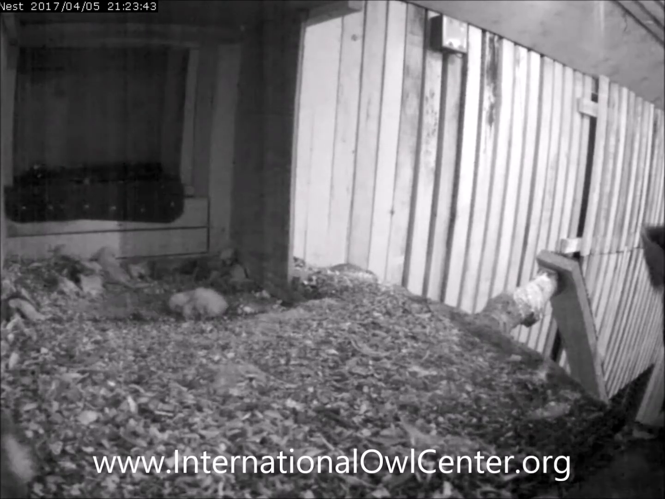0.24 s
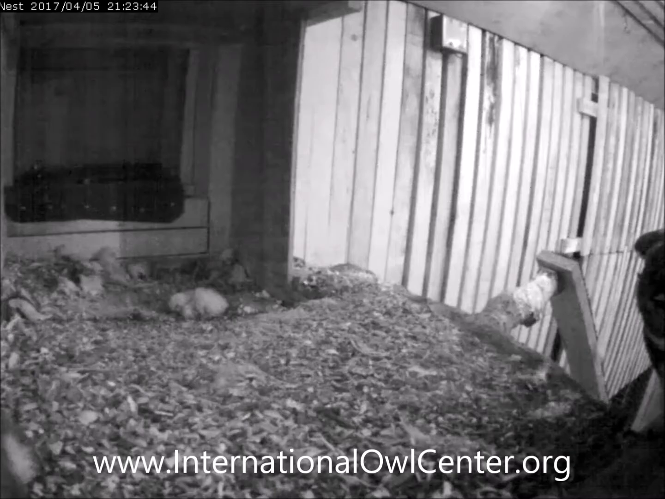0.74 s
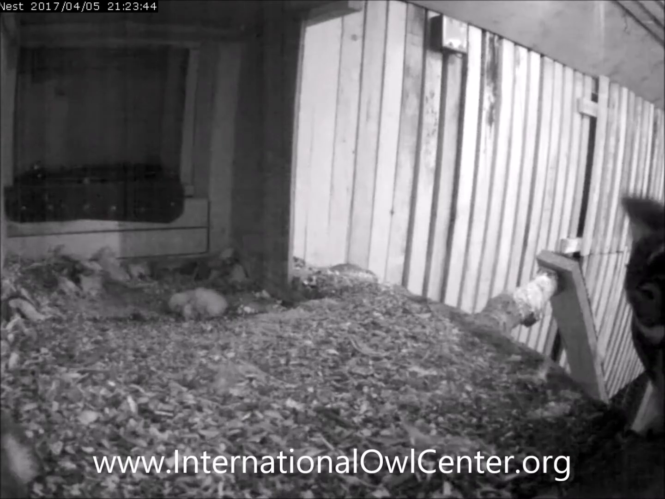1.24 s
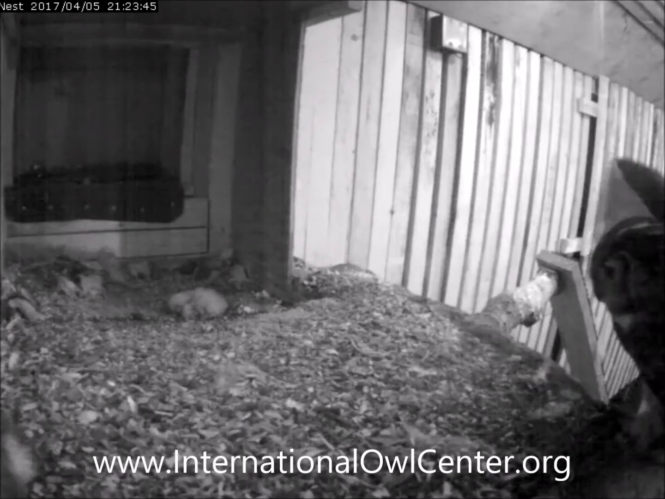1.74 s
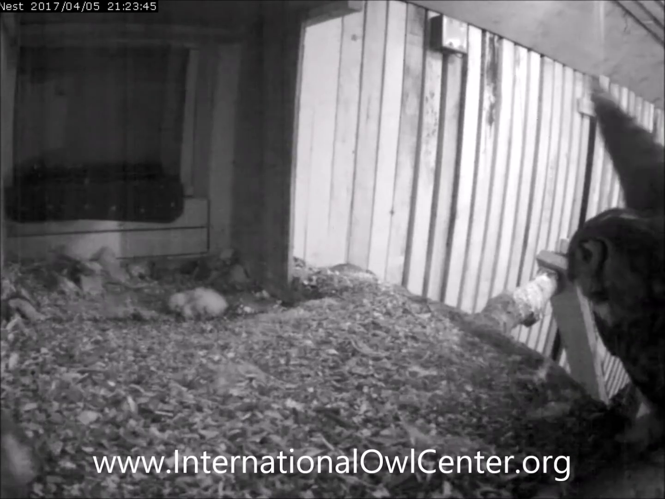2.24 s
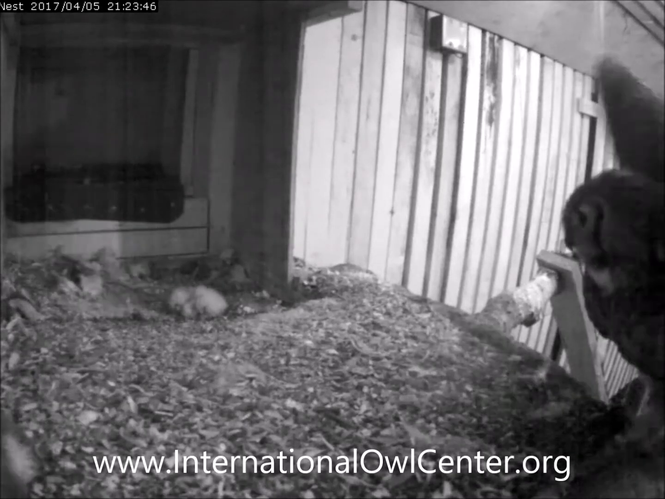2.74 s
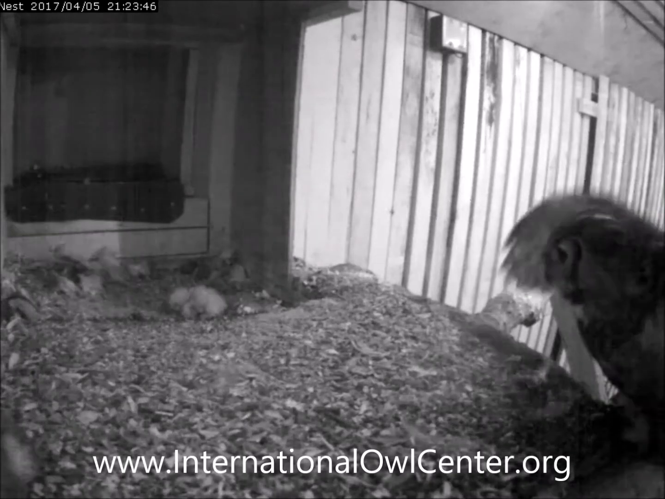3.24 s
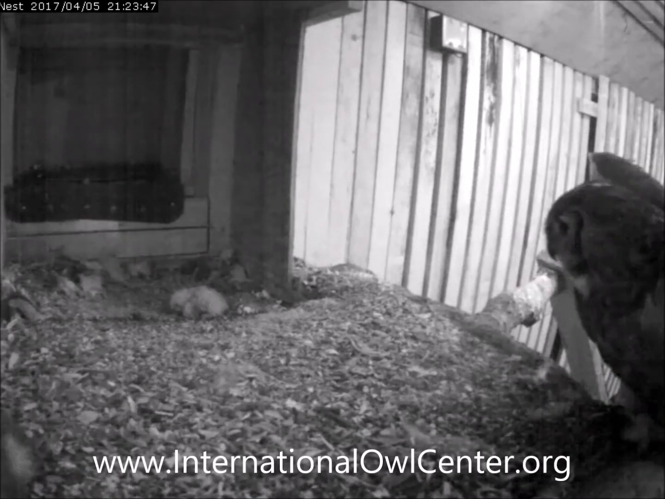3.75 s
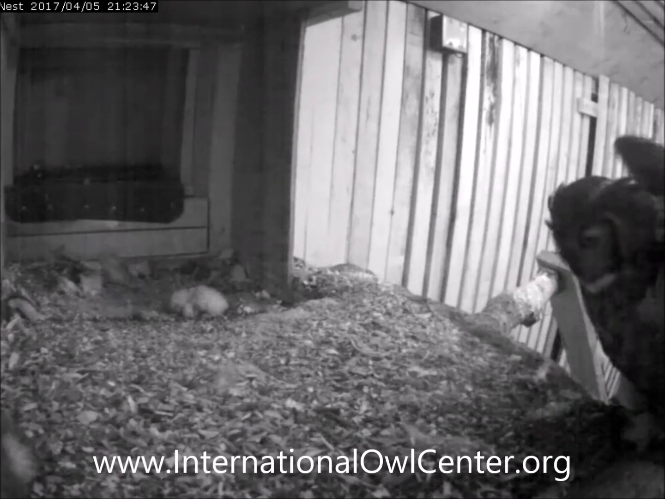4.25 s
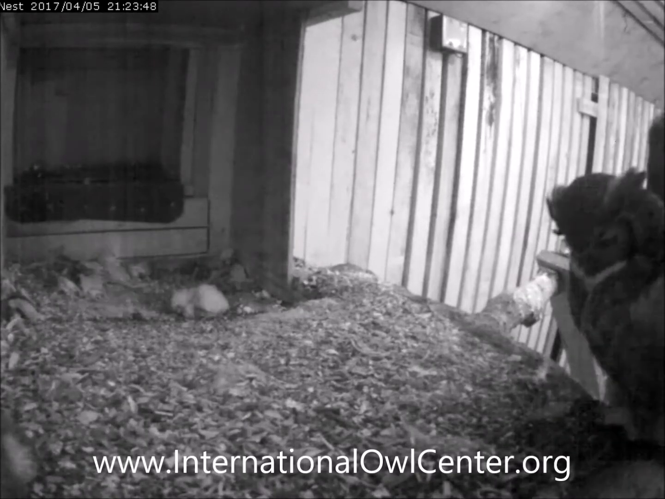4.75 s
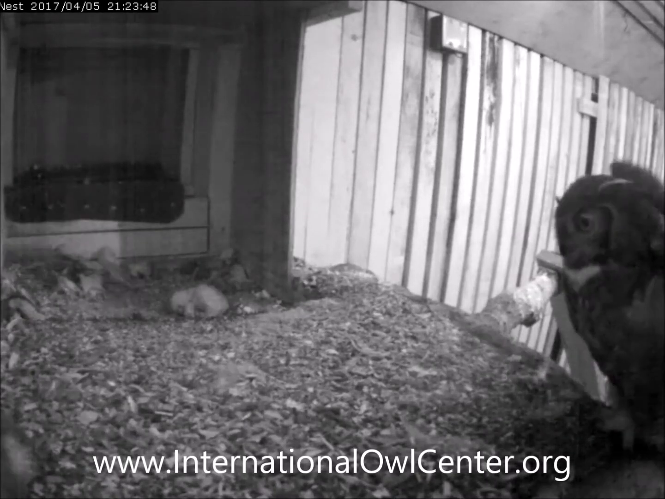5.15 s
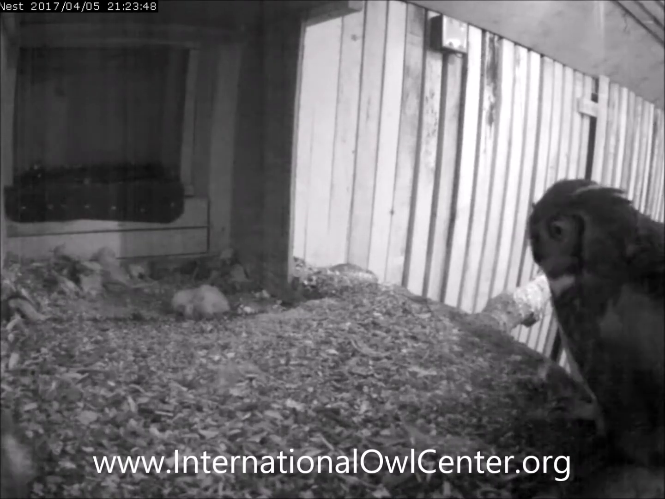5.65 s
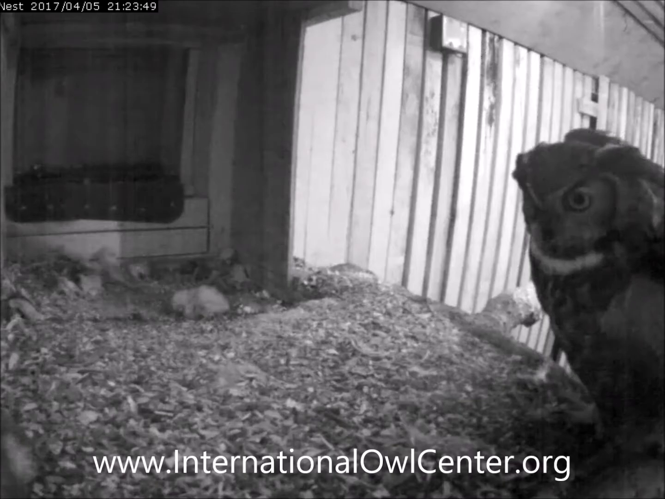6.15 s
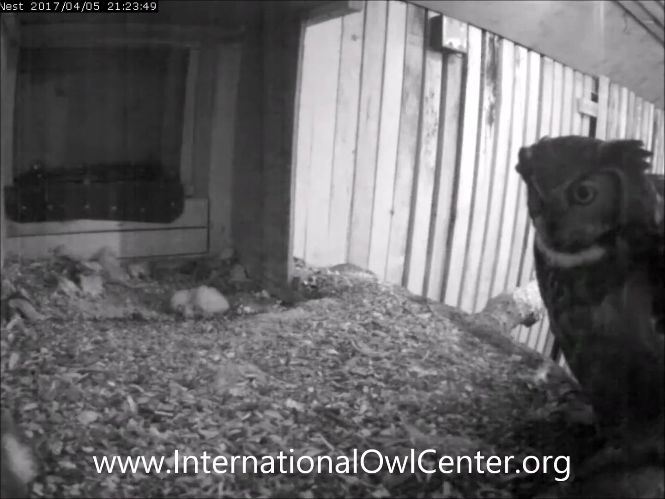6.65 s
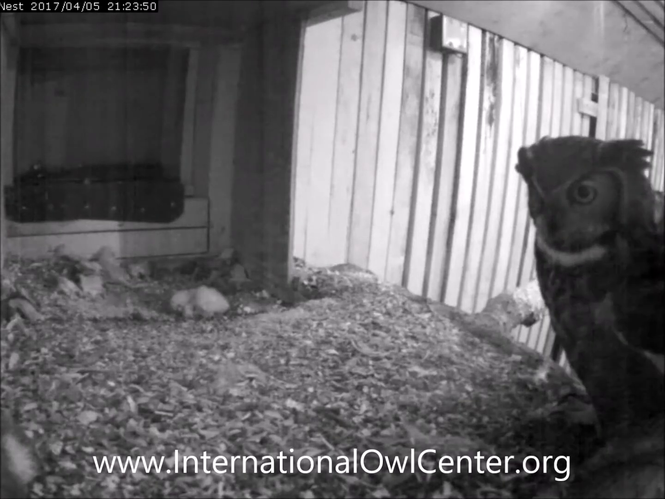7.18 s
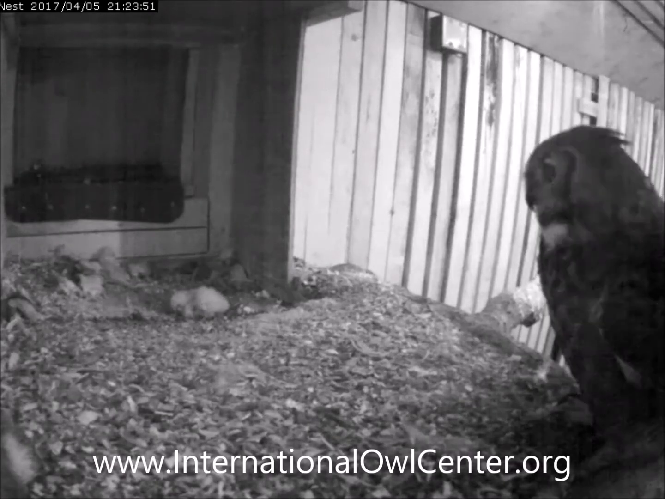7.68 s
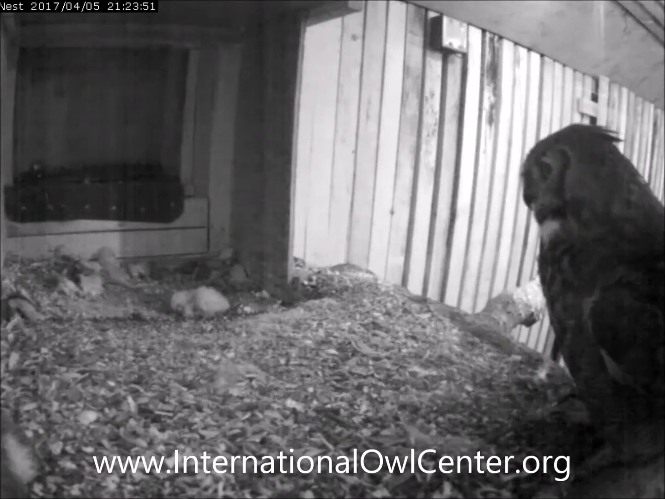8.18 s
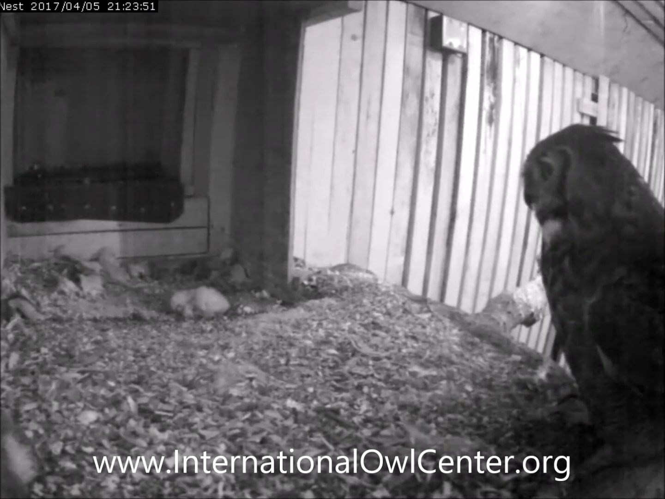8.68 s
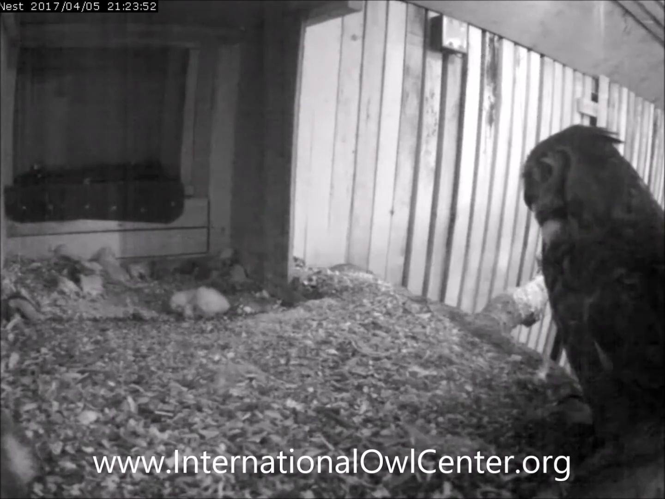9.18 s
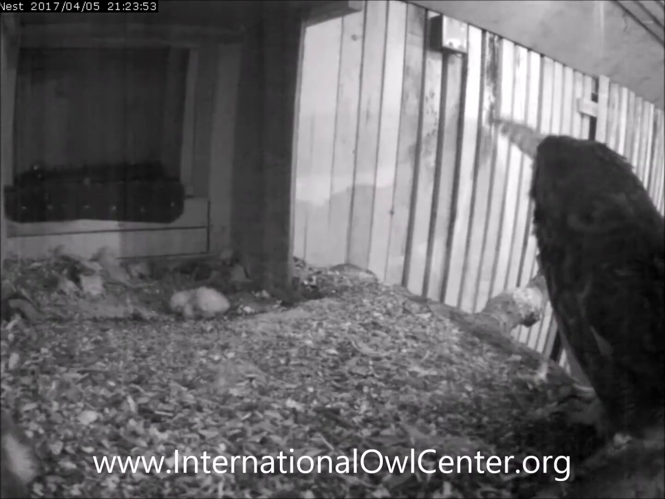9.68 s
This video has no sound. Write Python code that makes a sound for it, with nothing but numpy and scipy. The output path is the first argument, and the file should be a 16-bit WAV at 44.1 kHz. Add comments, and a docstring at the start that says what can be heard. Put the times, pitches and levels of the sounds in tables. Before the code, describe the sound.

Inside a tight wooden nest box, clusters of woody knocks and claw clicks mix with rustling chips as an owl moves about, chittering in very short, high chirps. The steps thin out, then another bird flaps closer outside, growing louder until just before the end. Steady airy hiss and a faint two-tone hum lie underneath, all heard through a small microphone with limited treble.

```python
"""Owl in a nest box at night

A large owl climbs into a wooden box: talons knock on the boards, feathers sweep the wall, feet scuff
through wood chips and its weight thumps the floor. It chitters in quick, raspy, gliding chirps.
A second bird flies up outside with swelling wingbeats. Under it all lie box air, a hissing band
near 2.8 kHz and a faint two-tone hum, heard through a small narrow-band microphone."""
import sys
import numpy as np
from scipy import signal
from scipy.fft import rfft, irfft
from scipy.io import wavfile
from scipy.ndimage import uniform_filter1d

SR = 44100
rng = np.random.default_rng(int(sys.argv[2]) if len(sys.argv) > 2 else 0)


def unload_audio(sound):
    """Save the sound as a 16-bit wav file, at the path given as the first command line argument."""
    columns = np.transpose(np.atleast_2d(sound))
    # keep every value between -1 and 1, then stretch to whole-number steps
    steps = np.round(np.clip(columns, -1, 1) * 32767)
    wavfile.write(sys.argv[1], SR, steps.astype(np.int16))


N = 437472

# Tone curves. Each row: frequency in Hz, relative spectral density in dB.
AIR_EQ = [(20, -57), (30, -45), (95, -25.5), (155, -7.5), (372, -7.5), (605, -7), (2200, -14.5),
          (2400, -15), (2700, -2), (3000, -4), (3340, -15.5), (5950, -19.5), (6900, -13.5)]   # box air and microphone hiss
WING_PUSH_EQ = [(25, -32), (60, -15), (250, 0), (420, 0), (700, -1), (1100, -11.5), (2000, -39)]   # air shoved by a wing
FEATHER_EQ = [(400, -27.5), (900, 1.5), (1300, -1.5), (2000, -6.5), (2700, -7.5), (3600, -12.5),
              (7000, -24)]   # air hissing through feathers
CHIP_EQ = [(80, -43), (200, -19), (600, 1.5), (1200, -5.5), (2000, -1), (3000, 3), (5000, -5), (7000, -15)]   # rustling wood chips
CRACK_EQ = [(1000, -24), (1800, -5.5), (2900, 0), (3700, 2), (4700, -2.5), (5900, -3.5), (7000, -2)]   # the sharp edge of a knock
# Hum tones. Each row: frequency in Hz, rms level in dB.
HUM_TONES = [(425.3, -60), (532.9, -58)]
# The owl's weight dropping on the floor. Each row: peak time in seconds, level in dB, fade in seconds.
FLOOR_THUMPS = [(0.49, -50, 0.4), (1.82, -49, 0.13), (3.269, -47, 0.088), (4.19, -47, 0.084),
                (4.68, -44.5, 0.25), (5.549, -50, 0.095), (6.24, -40.5, 0.1)]
# Steady rush of air as the second bird nears. Each row: time in seconds, level in dB.
APPROACH_RUSH = [(7.62, -76), (7.75, -50), (8.05, -44.5), (8.5, -43.5), (9.1, -40.5), (9.6, -39),
                 (9.76, -53.5), (9.92, -53)]
# Wingbeats outside. Each row: peak time in seconds, air push and feather hiss in relative dB,
# swell and fade in seconds.
WINGBEATS = [(7.691, -44.5, -43.5, 0.042, 0.17), (7.749, -47, -36.5, 0.089, 0.12),
             (7.851, -44, -45.5, .078, 0.089), (7.998, -39.5, -37.5, 0.043, 0.092),
             (8.21, -50, -43.5, 0.093, 0.037), (8.28, -41, -50, 0.069, 0.038),
             (8.42, -37, -37.5, 0.056, 0.05), (8.615, -38.5, -38, 0.083, 0.046),
             (8.799, -39.5, -40, 0.1, 0.067), (8.858, -41, -41, .05, 0.044),
             (8.959, -40.5, -37.5, 0.072, 0.12), (9.152, -32.5, -31.5, 0.09, 0.17),
             (9.34, -29.5, -37, 0.099, 0.16), (9.546, -29.5, -31.5, 0.03, 0.22)]
# Feathers along the wall. Each row: peak time in seconds, level in dB, swell and fade in seconds.
WALL_SWEEPS = [(.485, -44, .07, .06), (4.625, -43, 0.027, 0.079), (4.7, -52, 0.06, 0.08),
               (1.116, -47.5, 0.28, 0.077), (4.176, -38, 0.036, 0.059), (9.61, -40, 0.075, 0.15),
               (9.76, -41.5, 0.01, 0.04)]
# Feet and feathers in the chips. Each row: peak time in seconds, level in dB, swell and fade in
# seconds, treble gain in dB.
CHIP_SCUFFS = [(0.444, -38.5, 0.01, 0.18, 1), (0.494, -35, 0.085, 0.042, 5),
               (0.676, -43.5, 0.023, 0.018, 2), (1.528, -39, 0.063, 0.049, -6), (1.614, -53, .1, 0.021, 12),
               (1.82, -44, 0.044, 0.017, 3), (1.858, -46.5, 0.027, 0.16, 12.5),
               (2.036, -32.5, 0.14, 0.071, -19), (2.065, -48, .01, 0.51, 6.5), (2.702, -51, 0.57, 1.3, 4),
               (2.771, -46, 0.021, .016, -1), (2.836, -39, 0.013, 0.02, -1), (2.885, -44, .021, 0.013, -3),
               (2.858, -37, 0.013, 0.017, -9), (2.916, -37.5, 0.0086, 0.06, -5),
               (3.1, -43, 0.065, 0.017, -5), (3.184, -35.5, 0.0045, 0.22, 2),
               (3.63, -48.5, 0.14, 0.026, 14), (3.792, -29, 0.015, 0.0044, 8),
               (3.824, -23.5, 0.0046, 0.013, -6), (4.186, -39.5, 0.088, 0.18, -3),
               (4.613, -30.5, 0.01, 0.079, -4), (4.656, -28.5, 0.033, 0.041, -9),
               (4.684, -30.5, 0.025, 0.053, -22), (4.739, -32, 0.12, 0.012, -2),
               (4.82, -44.5, 0.15, 0.14, 1), (5.006, -42, 0.18, 0.064, 6.5),
               (5.405, -40.5, 0.05, 0.07, 5.5), (5.543, -32.5, 0.063, 0.091, 5.5),
               (5.87, -45.5, 0.12, 0.062, 3.5), (6.215, -39, 0.064, 0.047, -9),
               (6.763, -42.5, 0.03, 0.058, 5.5), (6.912, -41.5, 0.18, 0.027, 6.5),
               (7.385, -51.5, 0.13, 0.071, 14.5)]
# Resonances of the boards. Each row: frequency in Hz, relative level in dB, seconds to fade by 60 dB.
BOARD_MODES = [(285, 6, 0.011), (382, -12.5, 0.023), (588, -7, 0.052), (699, -3.5, 0.097),
               (910, 5.5, 0.033), (1082, 7.5, 0.016), (1270, 6.5, 0.033), (1398, 0.5, 0.041),
               (1662, 5, 0.023), (1740, -7.5, 0.013), (1902, 3, 0.046), (2140, 0.5, 0.058),
               (2438, 3.5, 0.03), (2580, -2.5, 0.069), (3800, -7, 0.063)]
# Talons and chips hitting the boards. Each row: start in seconds, thud and crack levels in dB,
# ring length as a factor, centre of the ring in Hz.
BOARD_HITS = [(.444, -35, -43, 1.2, 1190), (0.477, -18.5, -36, 1, 900), (.5, -31, -40, 2, 1400),
              (0.479, -23, -30, 2.6, 2510), (1.531, -39, -60, 1.1, 966), (1.603, -35, -59, 3.6, 1240),
              (1.853, -30.5, -46, 0.93, 1240), (1.88, -33, -32.5, 2.9, 960), (1.923, -30, -37.5, 2.2, 1020),
              (1.978, -17, -44, 1.1, 970), (2.005, -29, -49, 0.93, 915), (2.013, -23, -54, 0.74, 750),
              (2.024, -25, -50, 0.37, 1340), (2.041, -12.5, -19.5, 0.61, 2340),
              (2.042, -14, -43, 0.51, 820), (2.761, -25.5, -42, 1.3, 635), (2.767, -31, -48, 1.6, 1250),
              (2.801, -27.5, -33, 0.39, 638), (2.829, -20, -20.5, 1.9, 1230), (2.834, -39, -25, 1.2, 2700),
              (2.85, -18, -19.5, 0.81, 1390), (2.856, -22, -27, 0.58, 900), (2.879, -27.5, -42, 0.92, 1500),
              (2.913, -22.5, -25.5, 1.17, 1010), (3.095, -24.5, -34, 1.6, 1410),
              (3.137, -47, -20, 0.75, 2900), (3.162, -54, -37, 0.66, 2400), (3.169, -44, -23.5, 1.6, 1510),
              (3.181, -19.5, -16, 0.72, 1340), (3.192, -25.5, -50, 1.3, 1240), (3.21, -23, -47, 0.53, 613),
              (3.218, -20.5, -44, 0.52, 2250), (3.289, -33, -42, 2.5, 2230), (3.786, -21, -36, 0.56, 2220),
              (3.822, -17.5, -26, 1.63, 1130), (3.823, -32, -42, 0.77, 2800),
              (4.171, -21.5, -45, 0.99, 1850), (4.606, -22, -33.5, 1.4, 1920), (4.62, -20, -43, 1.5, 800),
              (4.667, -22.5, -45, .5, 3800), (4.669, -6.5, -46, 1.8, 606), (4.67, -10.5, -43, 0.73, 1630),
              (4.673, -8, -44, .8, 1860), (4.677, -21, -49, 0.39, 1490), (4.681, -21, -47, 0.97, 1110),
              (4.687, -12, -53, 1.3, 684), (5.398, -31, -52, 2, 1110), (5.504, -24.5, -38, 1.4, 934),
              (5.549, -25.5, -27.5, 1.7, 876), (5.857, -37.5, -60, 4, 767), (6.03, -34, -48, 2.8, 1270),
              (6.2, -42, -29, 0.79, 738), (6.221, -21.5, -20.5, 1.4, 905), (6.778, -38, -48, 0.91, 546),
              (6.875, -39, -42, .6, 2410), (6.906, -36, -50, 0.42, 2700), (6.916, -37, -48, .5, 2400),
              (7.362, -28.5, -48, 0.56, 2110), (7.363, -29.5, -45, 0.19, 3830),
              (7.735, -25.5, -42, 1.1, 1980), (7.982, -29, -60, 0.92, 970), (9.149, -26.5, -40, 1.1, 623),
              (9.151, -23, -43, 0.49, 2800), (9.535, -29, -42, 1.2, 450)]
# Reflections off the box walls. Each row: delay in seconds, level in dB.
WALL_ECHOES = [(.0045, -4.5), (.0085, -12.5)]
# Chitter notes. Each row: start in seconds, level in dB, start and end pitch in Hz, length in seconds.
CHITTER_NOTES = [(2.65, -32, 2480, 2200, 0.0039), (2.672, -32, 2450, 2760, 0.0063),
                 (2.691, -29, 3430, 3740, 0.005), (2.695, -35.5, 3800, 4250, 0.0069),
                 (2.936, -24, 2930, 2720, 0.0036), (2.943, -26.5, 2720, 2830, 0.0051),
                 (2.962, -20, 3050, 3940, 0.01), (2.977, -26, 3720, 4200, 0.0017),
                 (3.08, -30, 3900, 3230, 0.014), (3.101, -32.5, 3150, 2820, 0.024),
                 (3.538, -27, 3220, 4070, 0.0057), (3.639, -25, 3570, 2300, 0.008),
                 (3.645, -30, 3660, 4470, 0.0078), (3.674, -25.5, 3350, 4380, 0.0066),
                 (3.774, -23.5, 4060, 2420, 0.0081), (3.807, -20.5, 3210, 4500, 0.0088),
                 (3.887, -23, 3160, 2350, 0.0019), (3.891, -28, 4300, 3320, 0.017),
                 (3.916, -35, 3070, 2700, 0.024), (4.302, -24.5, 2340, 2050, 0.0047),
                 (4.311, -23.5, 2880, 4050, 0.0076), (4.425, -21, 3280, 2380, 0.0027),
                 (4.432, -29, 2450, 3000, 0.0055), (4.433, -27.5, 4030, 4200, 0.013),
                 (4.46, -20, 3360, 4380, 0.0059), (4.558, -20.5, 3890, 2460, 0.0062),
                 (4.565, -24, 3980, 4220, 0.0077), (4.59, -28.5, 3180, 4550, 0.0094),
                 (4.685, -19.5, 3487, 3484, 0.0061), (4.808, -32, 4130, 4110, 0.018),
                 (4.807, -38, 2720, 3000, 0.014)]


def from_db(db):
    """Decibels to gain."""
    return 10 ** (np.asarray(db) / 20)


def rms_one(x):
    """Scale to rms 1."""
    return x / np.sqrt(np.mean(x ** 2) + 1e-20)


def filtered(x, order, hz, kind="band"):
    """Butterworth band-, low- or high-pass."""
    return signal.sosfilt(signal.butter(order, hz, kind, fs=SR, output="sos"), x)


def coloured(x, curve):
    """Shape a signal with a tone curve; rms 1."""
    hz = np.maximum(np.arange(len(x) // 2 + 1) * SR / len(x), 1)
    curve_hz, curve_db = np.transpose(curve)
    gain = from_db(np.interp(np.log(hz), np.log(curve_hz), curve_db))
    return rms_one(irfft(rfft(x) * gain, len(x)))


def drift(rate_hz):
    """Slow random wander with rms 1."""
    hop, run_in = 40, 2000
    pole = np.exp(-2 * np.pi * rate_hz * hop / SR)
    noise = rng.standard_normal(N // hop + run_in + 2)
    slow = signal.lfilter([1], [1, -2 * pole, pole * pole], noise)[run_in:]
    return np.interp(np.arange(N) / hop, np.arange(len(slow)), rms_one(slow))


def tremble(top_hz):
    """Fast random wobble with rms 1."""
    return rms_one(filtered(rng.standard_normal(N), 2, top_hz, "low"))


def grains(per_s, spread_db):
    """Tiny random snaps of uneven size."""
    sizes = from_db(spread_db * np.minimum(rng.exponential(1, N), 5)) * rng.choice([-1, 1], N)
    return sizes * (rng.random(N) < per_s / SR)


def swell(peak_s, peak_db, swell_s, fade_s):
    """Envelope that climbs 20 dB per swell_s to a rounded peak and sinks 20 dB per fade_s."""
    first = max(0, int((peak_s - 3 * swell_s - .01) * SR))
    end = min(N, int((peak_s + 3 * fade_s + .01) * SR))
    t = np.arange(first, end) / SR - peak_s
    level_db = peak_db - 20 * np.maximum(-t / swell_s, t / fade_s)
    out = np.zeros(N)
    out[first:end] = from_db(uniform_filter1d(level_db, size=400))
    return out


def add(out, start_s, sound):
    """Mix a short sound in at its cue."""
    i = round(start_s * SR)
    out[i:i + len(sound)] += sound[:N - i]


def air_and_hum(air_db=-42.5, waver_rad=.45):
    """The bed: gently uneven box air and microphone hiss, with two wavering hum tones."""
    t = np.arange(N) / SR
    out = coloured(rng.standard_normal(N), AIR_EQ) * from_db(air_db + .6 * drift(.49))
    for hz, db in HUM_TONES:
        amplitude = np.sqrt(2) * from_db(db + 3.44 * drift(5.2))
        out += amplitude * np.sin(2 * np.pi * hz * t + waver_rad * drift(25))
    return out


def floor_thumps(swell_s=.019, rumble_db=-71):
    """The owl's weight lands as dull thumps through the floor, over a faint lumpy rumble."""
    thump = rms_one(filtered(rng.standard_normal(N), 2, (123, 277)))
    rumble = rms_one(filtered(rng.standard_normal(N), 3, (51, 180)))
    landings = sum(swell(s, db, swell_s, fade_s) for s, db, fade_s in FLOOR_THUMPS)
    return thump * landings + rumble * from_db(rumble_db - 5 * drift(2.5))


def wingbeats(flap_share=.43):
    """Each stroke shoves lumpy low air, thumps and draws hiss through the feathers, over a steady rush."""
    rush_db = np.interp(np.arange(N) / SR, *np.transpose(APPROACH_RUSH), left=-120, right=-120)
    push_power, hiss_power = from_db(rush_db) ** 2, from_db(rush_db - .5) ** 2
    flaps = np.zeros(N)
    for s, push_db, hiss_db, swell_s, fade_s in WINGBEATS:
        push_power += swell(s, push_db, swell_s, fade_s) ** 2
        hiss_power += swell(s, hiss_db, swell_s, fade_s) ** 2
        # a shorter thump marks the bottom of the stroke
        flaps += swell(s, push_db + .5, flap_share * swell_s, flap_share * fade_s)
    push = coloured(rng.standard_normal(N), WING_PUSH_EQ) * from_db(2.4 * drift(28))
    hiss = coloured(grains(7000, .94), FEATHER_EQ) * from_db(-1 + .8 * drift(24))
    thump = rms_one(filtered(rng.standard_normal(N), 2, (282, 435)))
    return push * np.sqrt(push_power) + hiss * np.sqrt(hiss_power) + thump * flaps


def feather_sweeps():
    """Wing and tail feathers brush the wall with a soft, bright crackle of barbs."""
    barbs = rms_one(filtered(grains(1800, 2.0), 2, (3200, 5800)))
    return barbs * from_db(2.8 * drift(30)) * sum(swell(*row) for row in WALL_SWEEPS)


def chip_shuffle(wood_db=3):
    """Wood chips snap in clumps and set the boards ringing; each scuff has its own brightness."""
    snaps = grains(4000 * from_db(2.3 * drift(20)), 2.24)
    t = np.arange(2500) / SR
    board_ring = sum(from_db(db - 60 * t / t60) * np.sin(2 * np.pi * hz * t)
                     for hz, db, t60 in BOARD_MODES)
    wood = rms_one(signal.fftconvolve(snaps, board_ring)[:N])
    rustle = rms_one(coloured(snaps, CHIP_EQ) + from_db(wood_db) * wood)
    treble = filtered(rustle, 2, 2600, "high")
    out = sum(swell(s, db, swell_s, fade_s) * (rustle - treble + from_db(treble_db) * treble)
              for s, db, swell_s, fade_s, treble_db in CHIP_SCUFFS)
    return filtered(out, 2, 260, "high")


def board_thud(t, ring_scale, centre_hz, detune=.018, attack_s=.0006, impact_db=13, impact_cycles=5):
    """A cluster of contacts rings the board modes near centre_hz, a little differently each time."""
    ring = np.zeros(len(t))
    chance = rng.standard_normal((2, len(BOARD_MODES)))
    for (hz, db, t60), level_chance, pitch_chance in zip(BOARD_MODES, *chance):
        mode_db = db + 3.4 * level_chance - 13 * np.log2(hz / centre_hz) ** 2
        envelope = from_db(mode_db - 60 * t / (t60 * ring_scale))
        ring += envelope * np.sin(2 * np.pi * hz * (1 + detune * pitch_chance) * t)
    # the blow itself: a broad pulse at the front of the ring
    ring += from_db(impact_db - 60 * t * centre_hz / impact_cycles) * np.sin(2 * np.pi * centre_hz * t)
    contacts = rng.standard_normal(len(t)) ** 3 * np.exp(-t / (.0013 * ring_scale))
    contacts[0] = 25   # a hard first touch
    thud = np.convolve(ring * (1 - np.exp(-t / attack_s)), contacts[:900])[:len(t)]
    return thud / np.abs(thud).max()


def talon_crack(t, ring_scale, snap_t60_s=.007, tail_t60_s=.042, echo_s=.005, attack_s=.0008):
    """A bright snap of noise, one softer echo off the box wall and a short tail."""
    noise = coloured(rng.standard_normal(len(t)), CRACK_EQ)
    snap = from_db(9 - 60 * t / snap_t60_s)
    echo = from_db(-5) * np.interp(t - echo_s, t, snap, left=0)
    tail = from_db(-60 * t / (tail_t60_s * ring_scale))
    return noise * (snap + echo + tail) * (1 - np.exp(-t / attack_s))


def knocks():
    """Talons and chips strike the boards: each hit layers a woody thud with a crack."""
    out, t = np.zeros(N), np.arange(6000) / SR
    for s, thud_db, crack_db, ring_scale, centre_hz in BOARD_HITS:
        ring_scale = max(ring_scale, .2)
        add(out, s, from_db(thud_db) * board_thud(t, ring_scale, centre_hz))
        add(out, s, from_db(crack_db) * talon_crack(t, ring_scale))
    return filtered(out, 4, 410, "high")


def box_reverb(x, t60_s=.072, tail_db=-9):
    """The tight wooden space adds two wall echoes and a short diffuse tail."""
    t = np.arange(round(.25 * SR)) / SR
    tail = rng.standard_normal(len(t)) * from_db(-60 * t / t60_s) * (t > .004)
    response = from_db(tail_db) * tail / np.sqrt(np.sum(tail ** 2))
    response[0] = 1   # direct sound
    for delay_s, echo_db in WALL_ECHOES:
        response[round(delay_s * SR)] += from_db(echo_db)
    return signal.fftconvolve(x, response)[:N]


def chitter(flutter_db=3.6, jitter_rad=.4, breath_db=-19.5):
    """The owl's chirps: gliding tones, raspy from trembling level and pitch, trailed by hoarse breath."""
    notes, breath_envelope = np.zeros(N), np.zeros(N)
    flutter, jitter = tremble(280), tremble(700)
    for s, db, start_hz, end_hz, length_s in CHITTER_NOTES:
        i = np.arange(round(length_s * SR))
        progress, span = i / (length_s * SR), round(s * SR) + i
        pitch_hz = start_hz + (end_hz - start_hz) * progress ** .85   # glides fast, then slower
        phase = 2 * np.pi * np.cumsum(pitch_hz) / SR + jitter_rad * jitter[span]
        skew = 1.5 if end_hz > start_hz else .75   # rising notes peak late, falling ones start abruptly
        envelope = np.sin(np.pi * progress ** skew) ** .7 * from_db(db + flutter_db * flutter[span])
        add(notes, s, envelope * np.sin(phase))
        breath_envelope += swell(s + length_s, db + breath_db, length_s, fade_s=.04)
    breath = rms_one(filtered(grains(1200, 1.1), 2, (2420, 4400)))
    return filtered(notes + breath_envelope * breath, 6, (1900, 4500))   # throat and beak


def scene(side_db=-33):
    """All layers meet at one microphone; a faint smeared copy makes the two channels differ slightly."""
    owl = box_reverb(chitter()) + knocks() + chip_shuffle() + feather_sweeps()
    mono = owl + wingbeats() + floor_thumps() + air_and_hum()
    smear = rng.standard_normal(600)
    side = from_db(side_db) * np.convolve(mono, smear / np.sqrt(len(smear)))[300:300 + N]
    return np.array([mono + side, mono - side])


def record(dry, band_top_hz=7050, stop_hz=8100):
    """A narrow-band link cuts the top off steeply near 7 kHz."""
    narrow = signal.sosfilt(signal.ellip(10, .3, 45, band_top_hz, fs=SR, output="sos"), dry)
    return signal.sosfilt(signal.cheby2(12, 70, stop_hz, fs=SR, output="sos"), narrow)


dry = scene()
out = record(dry)
unload_audio(out)
```